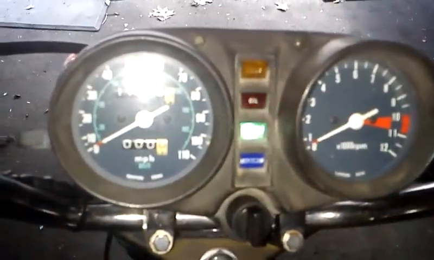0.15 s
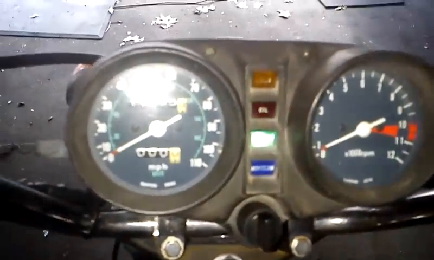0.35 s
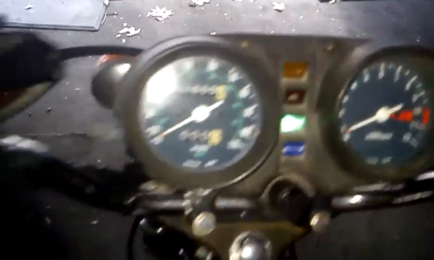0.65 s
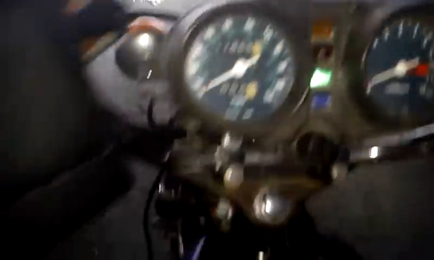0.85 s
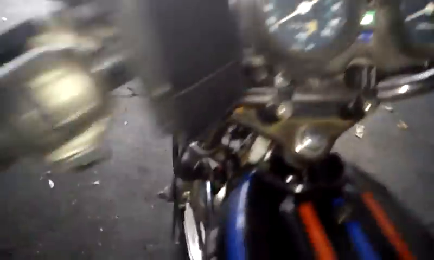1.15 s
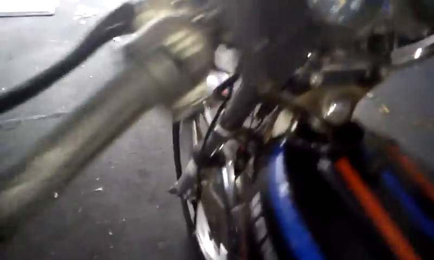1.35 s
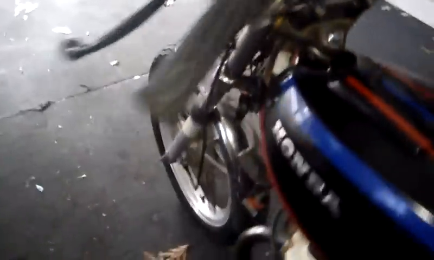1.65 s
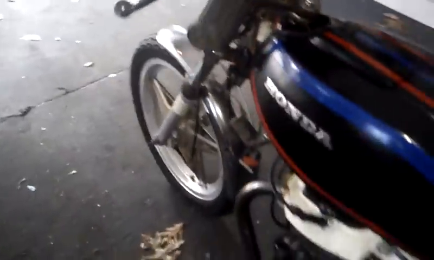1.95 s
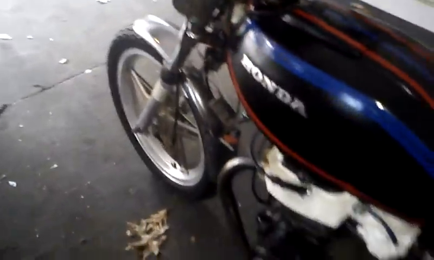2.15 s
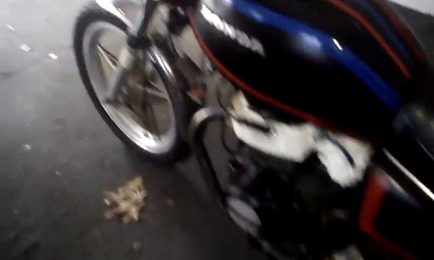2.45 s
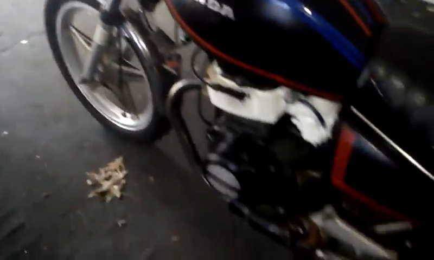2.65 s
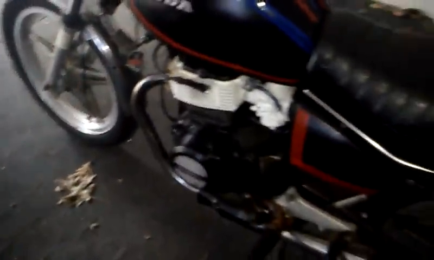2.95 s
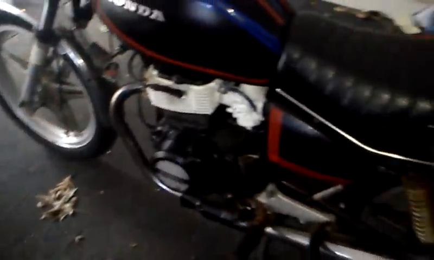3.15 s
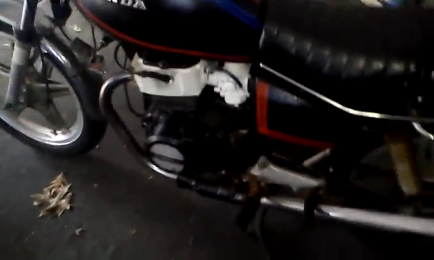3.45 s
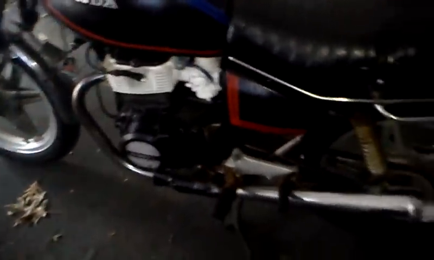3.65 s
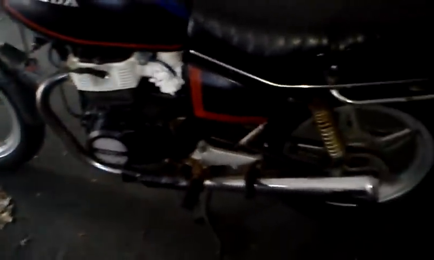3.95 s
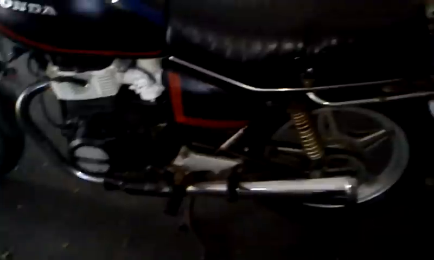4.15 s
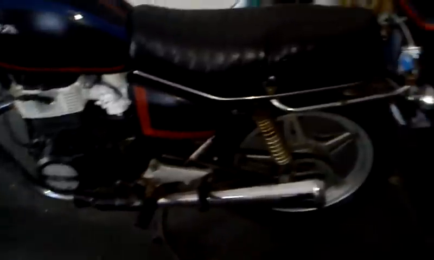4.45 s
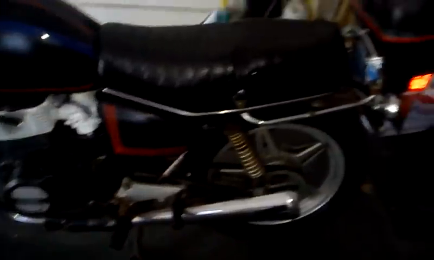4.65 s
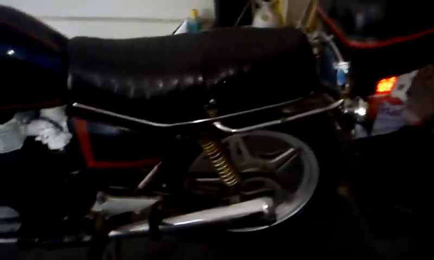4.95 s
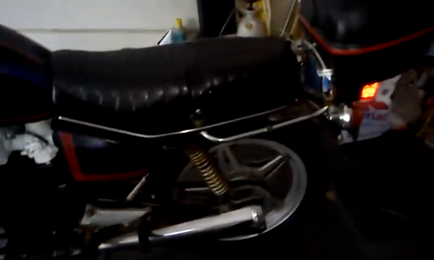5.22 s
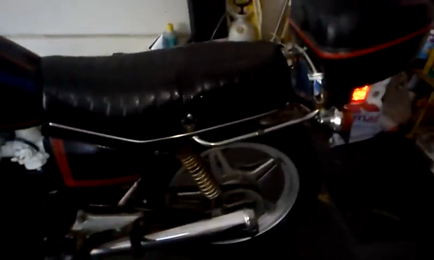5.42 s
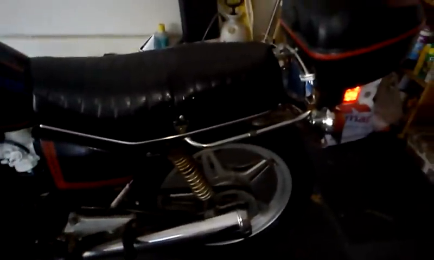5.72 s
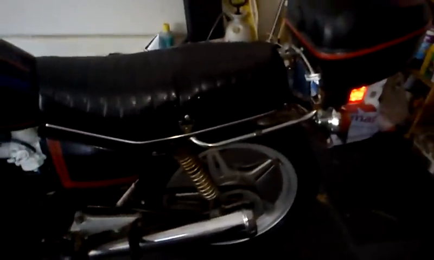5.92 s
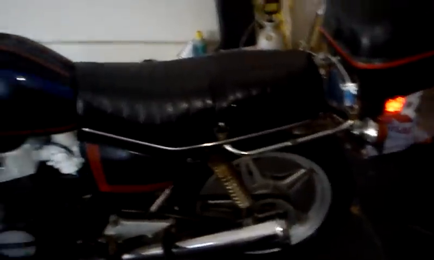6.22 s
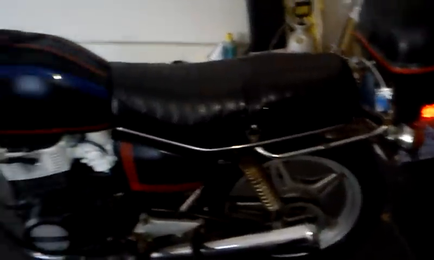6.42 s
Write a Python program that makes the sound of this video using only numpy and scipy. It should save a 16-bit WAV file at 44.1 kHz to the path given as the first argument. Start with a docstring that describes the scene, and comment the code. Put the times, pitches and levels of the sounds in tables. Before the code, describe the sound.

Heard up close in a garage, a freshly started motorcycle runs a little fast for a moment, then idles with a wandering speed. The exhaust thumps and spits in an uneven rhythm while the engine ticks, clatters and whirs. The tone shifts as the microphone travels from the handlebars to the bike's side, and later several faint, high squeals slip out of the engine.

```python
"""Garage: a twin-cylinder motorcycle has just caught and sinks to a lumpy idle.
Each cycle the near cylinder spits gas and booms its muffler; the far one answers weakly.
Gears whir, valve gear taps, chain and pistons clatter; a few thin squeals come later.
The microphone moves from the handlebars toward the bike's side; its limiter ducks at each firing."""
import sys
import numpy as np
from scipy import signal
from scipy.fft import rfft, irfft
from scipy.io import wavfile
from scipy.ndimage import uniform_filter1d

SR = 44100
rng = np.random.default_rng(int(sys.argv[2]) if len(sys.argv) > 2 else 0)


def waveform_to_disk(signal):
    """Save audio, clipped to [-1, 1], as 16-bit WAV at the path in sys.argv[1]."""
    frames = np.transpose(np.atleast_2d(signal))
    scaled = np.clip(frames, -1, 1) * 32767
    samples = np.round(scaled).astype(np.int16)
    wavfile.write(sys.argv[1], SR, samples)


N = 290178
TIME_S, FREQS_HZ = np.arange(N) / SR, np.fft.rfftfreq(N, 1 / SR)
FIRST_FIRING_S, TURNS_PER_CYCLE, IDLE_RPM = 0.0199, 2, 950
FAR_LAG_CYCLES = 0.39

# crank speed (time [s], speed [rpm])
CRANK_SPEED = [(0.296, 1281.6), (0.385, 1043.2), (0.99, 1102.9), (1.31, 908.2), (1.951, 994.7),
               (2.608, 849.0), (2.711, 938.6), (3.063, 890.3), (3.35, 981.5), (3.611, 882.2),
               (3.888, 999.1), (4.14, 938.6), (4.545, 1025.5), (4.981, 947.3), (5.07, 834.0),
               (5.888, 1107.4), (6.032, 802.0), (6.614, 928.6)]
# microphone path (time [s], position [0 handlebars, 1 side])
MIC_PATH = [(1.0, 0.076), (3.0, 0.71)]
# mechanical noise swelling as the microphone passes (time [s], gain [dB])
PROXIMITY = [(0, -0.5), (0.6, -2), (1.8, -2), (2.5, 1.5), (3.3, 1.5), (5, -1.5), (5.8, -0.5), (6.5, -2.5)]
# screening along the path (time [s], mid gain [dB], top gain [dB])
SCREENING = [(0, 4, 2.5), (1.0, 2.5, -2), (2.0, 1.5, 4), (2.7, -2.5, -2.5), (3.5, -1.5, -4), (4.3, 0, 0.5),
             (5.2, 0, -1), (6.5, 1.5, -2.5)]
# head and case resonances (frequency [Hz], width [Hz], boost [dB])
CASTING_MODES = [(1293, 40, 3.5), (2066, 49, 6), (2460, 80, 4.5), (3517, 65, 13.5), (4134, 190, 11.5),
                 (8960, 253, 11.5)]
# valve gear taps (lag after firing [cycles], relative level [dB])
VALVE_TAPS = [(.26, -24.5), (.335, -23.5), (.835, -27.5), (.9, -26)]
# muffler and garage modes per cylinder
# (delay [s], frequency [Hz], t60 [s], relative level at handlebars [dB], at side [dB])
NEAR_MODES = [(0.0004, 113.6, 0.22, 0, -3.5), (0.0008, 241.3, 0.26, -15, -12),
              (0.0098, 96.5, 0.17, 1.5, -3), (0.0231, 188.8, 0.29, -17, -37),
              (0.0251, 271.4, 0.26, -30, -17), (0.0257, 450, 0.16, -22, -32),
              (0.0302, 246.5, 0.28, -48, -16.5), (0.0389, 128.2, 0.25, -11.5, -19.5),
              (0.02, 310, 0.21, -18.5, -34), (0.02, 609, 0.2, -29, -40), (0.016, 66, 0.56, -21.5, -22.5)]
FAR_MODES = [(0.0123, 176.4, 0.021, -40, -14), (0.0137, 100, 0.14, -15.5, -18.5)]
# first reflection of the spit (delay [s], gain [dB])
REFLECTIONS = [(.0085, -22)]
# engine squeals (start [s], length [s], frequency [Hz], level [dB])
ENGINE_SQUEALS = [(3.14, 0.11, 8400, -39), (3.27, 0.16, 8990, -38), (4.867, 0.066, 10330, -41),
                  (5.627, 0.12, 8320, -29), (6.12, 0.11, 10140, -32)]
# noise spectra (frequency [Hz], relative density [dB])
WHIR_SPECTRUM = [(25, -34), (60, 4), (110, 19.5), (250, 21.5), (400, 11.5), (620, 9.5), (950, 4), (2300, 3),
                 (4200, -6), (7000, -5), (9000, -36.5), (10500, -27), (12000, -40), (16000, -49)]
CLATTER_SPECTRUM = [(200, -42), (600, -16), (1000, -2.5), (1350, 4), (1650, -0.5), (2100, 5.5), (3000, 0.5),
                    (4200, -3.5), (6500, 0), (9000, -7), (11500, -14.5), (16000, -23)]
SPIT_SPECTRUM = [(150, -2), (400, 1), (800, 0.5), (1500, -2), (2300, -0.5), (4000, 7), (5500, 2),
                 (7500, -0.5), (9000, 7), (10300, 0), (12000, -8.5), (16000, -7.5)]
GARAGE_SPECTRUM = [(150, -3), (450, 4.5), (1000, 0), (2300, 3.5), (4000, 5), (6500, 2.5), (9000, 4.5),
                   (10300, -1.5), (12000, -7.5), (16000, -12)]
CHUFF_SPECTRUM = [(20, -30), (45, -13), (68, -1), (95, -1.5), (130, -6), (165, -9), (250, -11),
                  (340, -21.5), (600, -26), (1200, -34), (4000, -72)]


def amp(db):
    """dB to gain."""
    return 10 ** (np.asarray(db) / 20)


def unit(x):
    """Scale to rms 1."""
    return x / np.sqrt(np.mean(x ** 2) + 1e-20)


def spectrum_db(table):
    """Spectrum table at every bin, interpolated in log frequency."""
    hz, db = np.transpose(table)
    return np.interp(np.log(FREQS_HZ + 1), np.log(hz + 1), db)


def curve(table, column=1):
    """Time table column at every sample."""
    rows = np.array(table)
    return np.interp(TIME_S, rows[:, 0], rows[:, column])


def add(mix, start_s, sound):
    """Mix in at start_s, which may be negative."""
    at = round(start_s * SR)
    sound = sound[max(-at, 0):]
    part = mix[max(at, 0):][:len(sound)]
    part += sound[:len(part)]


def colour(x, db):
    """Filter by a dB spectrum scaled to mean power 1."""
    return irfft(rfft(x) * unit(amp(db)), N)


def grit(count, spread_db):
    """Tiny impacts: noise whose level jumps every 0.3 ms."""
    sizes = np.repeat(amp(spread_db * rng.standard_normal(count // 14 + 1)), 14)
    return unit(rng.standard_normal(count) * sizes[:count])


def resonance(hz, width_hz):
    """Spectral peak of height 1."""
    return 1 / (1 + (2 * (FREQS_HZ - hz) / width_hz) ** 2)


def castings_db():
    """Resonances of cylinder head and cases."""
    return sum(db * resonance(hz, width_hz) for hz, width_hz, db in CASTING_MODES)


def speed_db(doubling_db):
    """Gain of doubling_db per doubling of crank speed over idle."""
    return doubling_db * np.log2(curve(CRANK_SPEED) / IDLE_RPM)


def firings_s():
    """Near-cylinder firing times, from before the start to past the end."""
    step_s = .001
    t = np.arange(-.3, N / SR + .3, step_s)
    rpm = np.interp(t, *np.transpose(CRANK_SPEED))
    cycles = np.cumsum(rpm) * step_s / 60 / TURNS_PER_CYCLE
    cycles -= np.interp(FIRST_FIRING_S, t, cycles)
    return np.interp(np.arange(-1, int(cycles[-1]) + 1), cycles, t)


def stroke(lag_cycles, width_cycles):
    """One Gaussian swell after each firing."""
    fires_s = firings_s()
    cycles = np.interp(TIME_S, fires_s, np.arange(len(fires_s)))
    offset = (cycles - lag_cycles + .5) % 1 - .5
    return np.exp(-(offset / width_cycles) ** 2)


def whir(level_db, doubling_db):
    """Gears, chain and bearings run continuously, louder with speed."""
    gain = amp(level_db + speed_db(doubling_db) + curve(PROXIMITY))
    return gain * colour(grit(N, spread_db=2), spectrum_db(WHIR_SPECTRUM) + castings_db())


def sizzle(hz, width_hz, level_db, side_db):
    """High thin steady whistle, strongest at the handlebars."""
    ring = colour(grit(N, spread_db=7.5), 20 * np.log10(resonance(hz, width_hz)))
    return ring * amp(level_db + side_db * curve(MIC_PATH))


def tappets(t60_s, scatter_s, click_db):
    """Each valve gear tap clicks and rings a few random modes of the finned head."""
    t, out = np.arange(SR // 16) / SR, np.zeros(N)
    decay = np.exp(-np.log(1000) * t / t60_s)
    fires_s = firings_s()
    for fire_s, period_s in zip(fires_s, np.diff(fires_s)):
        for lag_cycles, db in VALVE_TAPS:
            modes_hz = np.exp(rng.uniform(np.log(1250), np.log(9800), size=9))
            late, strength = rng.standard_normal(2)
            ring = np.sin(2 * np.pi * modes_hz[:, None] * t).mean(0) * decay
            click = rng.standard_normal(len(t)) * np.exp(-t / 0.00047) * amp(click_db)
            tap_s = fire_s + lag_cycles * period_s + scatter_s * late
            add(out, tap_s, amp(db + 2 * strength) * (2 * ring + click))
    return out * amp(curve(PROXIMITY))


def clatter(level_db, far_db, doubling_db):
    """Chain and pistons rattle as compression slows the crank; the near stroke harder at low speed."""
    near = amp(speed_db(doubling_db)) * stroke(lag_cycles=.912, width_cycles=.072)
    far = amp(far_db) * stroke(lag_cycles=.37, width_cycles=.09)
    rattle = (near + far) * grit(N, spread_db=0.5) * amp(level_db + curve(PROXIMITY))
    return colour(rattle, spectrum_db(CLATTER_SPECTRUM) + castings_db())


def boom(times_s, modes, level_db, uneven_db, rise_s):
    """Exhaust pulses ring the low modes; the balance follows microphone position."""
    pulses, t = np.zeros(N + SR), np.arange(SR // 4) / SR
    for pulse_s, strength in zip(times_s, rng.standard_normal(len(times_s))):
        add(pulses, pulse_s + 1, amp([level_db + uneven_db * strength]))  # 1 s pre-roll
    rings = np.zeros((2, len(t)))
    for delay_s, hz, t60_s, bars_db, side_db in modes:
        age_s = np.maximum(t - delay_s, 0)
        envelope = np.exp(-np.log(1000) * age_s / t60_s) * (1 - np.exp(-age_s / rise_s))
        rings -= amp([[bars_db], [side_db]]) * np.sin(2 * np.pi * hz * age_s) * envelope
    bars, side = signal.oaconvolve(pulses[None], rings, axes=1)[:, SR:SR + N]
    position = curve(MIC_PATH)
    return (1 - position) * bars + position * side


def spit(level_db, uneven_db, peak_s, rise_s, fall_s, patchy_db, crack_db):
    """Gas jets from the near exhaust valve, each with its own strength, colour and shock crack."""
    count = 1024
    t, jet = np.arange(count) / SR, np.zeros(N)
    envelope = np.exp(-((t - peak_s) / np.where(t < peak_s, rise_s, fall_s)) ** 2)
    for fire_s in firings_s():
        ripple_db = patchy_db * unit(uniform_filter1d(rng.standard_normal(count // 2 + 1), size=24))
        burst = irfft(rfft(grit(count, spread_db=1.5)) * unit(amp(ripple_db))) * envelope
        late, size = rng.random(2)
        crack = amp(crack_db) * size * np.array([-.5, 1, -.5])
        add(burst, peak_s * (0.36 + 1.5 * late), crack)
        add(jet, fire_s, amp(level_db + uneven_db * rng.standard_normal()) * burst)
    return colour(jet, spectrum_db(SPIT_SPECTRUM))


def garage(source, tail_db, t60_s, build_s):
    """One early reflection plus a diffuse tail that follows the source power and decays."""
    t = np.arange(SR // 2) / SR
    decay = (np.exp(-np.log(1000) * t / t60_s) * (1 - np.exp(-t / build_s))) ** 2
    power = abs(signal.oaconvolve(source ** 2, decay / decay.sum())[:N])
    tail = np.sqrt(power) * grit(N, spread_db=0.5)
    room = amp(tail_db) * colour(tail, spectrum_db(GARAGE_SPECTRUM))
    for delay_s, db in REFLECTIONS:
        add(room, delay_s, amp(db) * source)
    return room


def chuff(level_db, doubling_db):
    """Turbulent gas leaves the mufflers in one low puff per cycle, louder with speed."""
    turbulence = colour(rng.standard_normal(N), spectrum_db(CHUFF_SPECTRUM))
    flow = stroke(lag_cycles=.42, width_cycles=.24)
    return amp(level_db + speed_db(doubling_db)) * turbulence * flow


def squeals(width_hz):
    """Brief engine whistles of narrow-band noise."""
    out = np.zeros(N)
    for start_s, length_s, hz, db in ENGINE_SQUEALS:
        tone = unit(colour(rng.standard_normal(N), 20 * np.log10(resonance(hz, width_hz))))
        count = int(length_s * SR)
        add(out, start_s, amp(db) * tone[:count] * signal.windows.tukey(count, .5))
    return out


def screening(x, mid_hz, top_hz):
    """Tank and seat screen the engine by varying amounts along the path."""
    mid = signal.sosfiltfilt(signal.butter(1, mid_hz, "band", fs=SR, output="sos"), x)
    top = signal.sosfiltfilt(signal.butter(2, top_hz, "high", fs=SR, output="sos"), x)
    mid_gain, top_gain = amp(curve(SCREENING, column=1)), amp(curve(SCREENING, column=2))
    return x + mid * (mid_gain - 1) + top * (top_gain - 1)


def scene():
    """Exhaust, mechanics and room; mono."""
    near_s = firings_s()
    far_s = near_s[:-1] + FAR_LAG_CYCLES * np.diff(near_s)
    exhaust = boom(near_s, NEAR_MODES, level_db=-1.5, uneven_db=0.22, rise_s=0.0014)
    exhaust += boom(far_s, FAR_MODES, level_db=4.5, uneven_db=1.1, rise_s=0.0023)
    exhaust += chuff(level_db=-26, doubling_db=5.5)
    jet = spit(level_db=-2.4, uneven_db=0.5, peak_s=.0043, rise_s=.0021, fall_s=.0027,
               patchy_db=2.9, crack_db=2.5)
    room = garage(jet, tail_db=-6.5, t60_s=0.33, build_s=0.0042)
    mechanics = tappets(t60_s=.085, scatter_s=.003, click_db=-18)
    mechanics += clatter(level_db=-22.5, far_db=-8.5, doubling_db=-6)
    mechanics += squeals(width_hz=264)
    mechanics += sizzle(hz=8920, width_hz=520, level_db=-38, side_db=-12)
    mechanics += whir(level_db=-26.5, doubling_db=4.5)
    return screening(exhaust + jet + room + mechanics, mid_hz=(420, 1100), top_hz=10500)[None]


def limiter(x, threshold_db, recovery_db_per_s):
    """Cap on short-time power: fast attack, steady recovery."""
    power_db = 10 * np.log10(abs(uniform_filter1d(x[0] ** 2, size=230)) + 1e-12)
    over_db = np.maximum(power_db - threshold_db, 0)
    ramp_db = recovery_db_per_s * TIME_S
    cut_db = np.maximum.accumulate(over_db + ramp_db) - ramp_db
    return x * amp(-uniform_filter1d(cut_db, size=100))


def record(dry):
    """Bass cut, limiter, soft overload, band limit."""
    bass_cut_hz, edge_hz, ceiling = 25, 16050, .76
    thin = signal.sosfiltfilt(signal.butter(2, bass_cut_hz, "high", fs=SR, output="sos"), dry)
    held = limiter(thin, threshold_db=-15, recovery_db_per_s=485)
    clipped = held / (1 + (held / ceiling) ** 6) ** (1 / 6)
    lowpass = signal.firwin(511, edge_hz, window=("kaiser", 9), fs=SR)
    return signal.oaconvolve(clipped, lowpass[None], "same")


dry = scene()
out = record(dry)
waveform_to_disk(out)
```